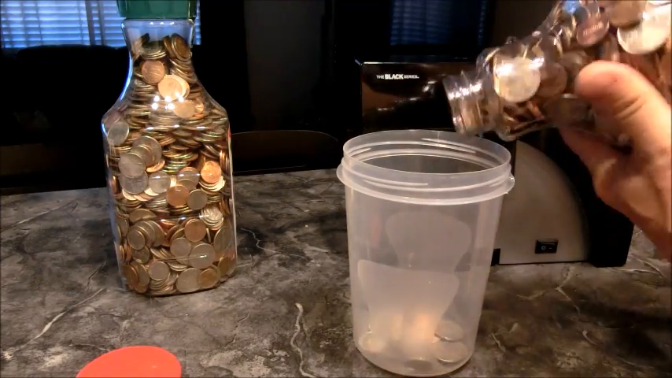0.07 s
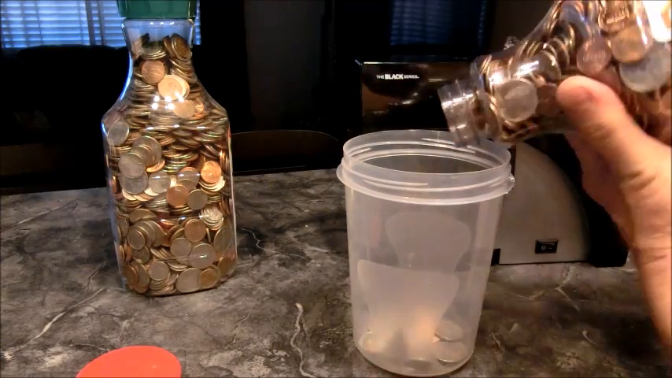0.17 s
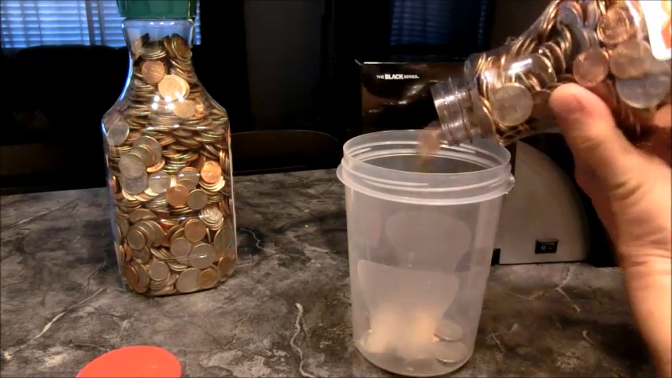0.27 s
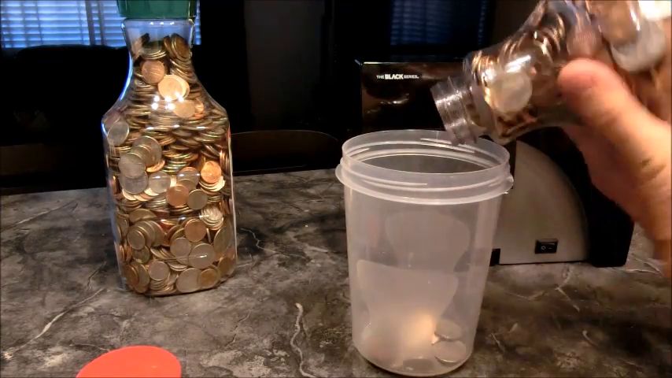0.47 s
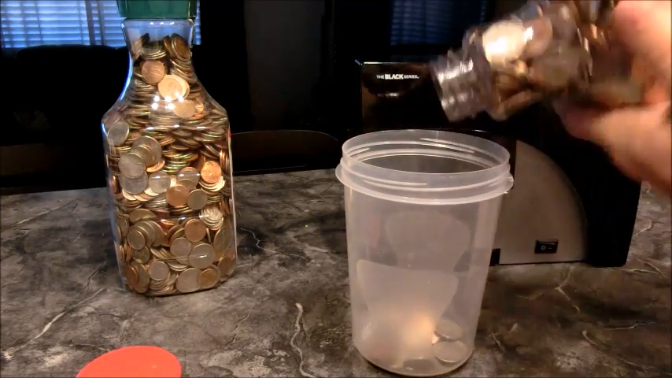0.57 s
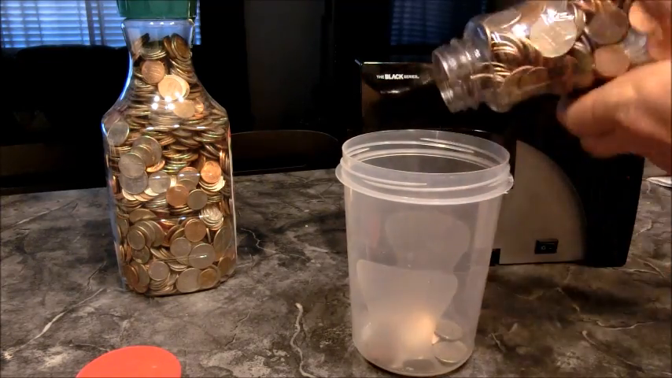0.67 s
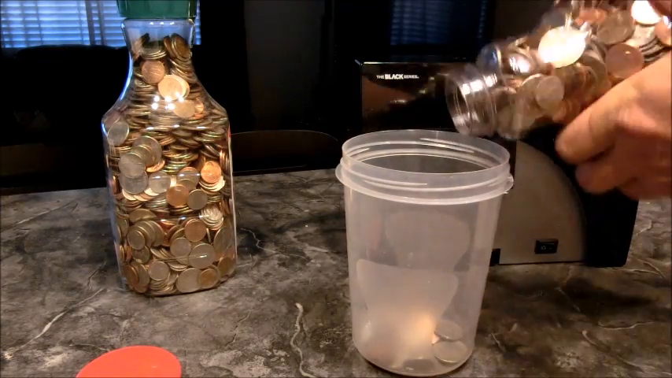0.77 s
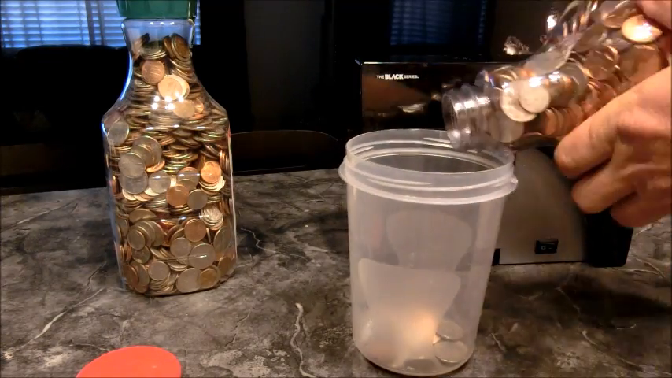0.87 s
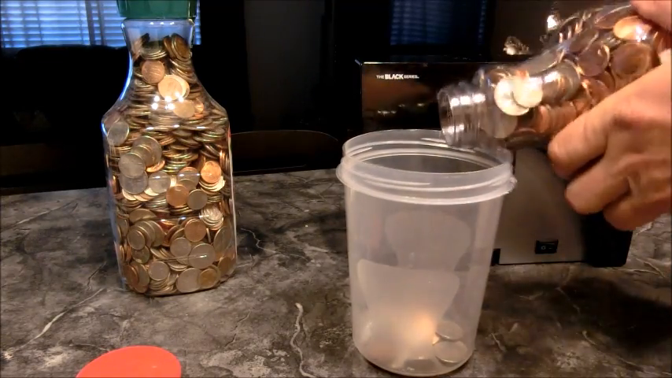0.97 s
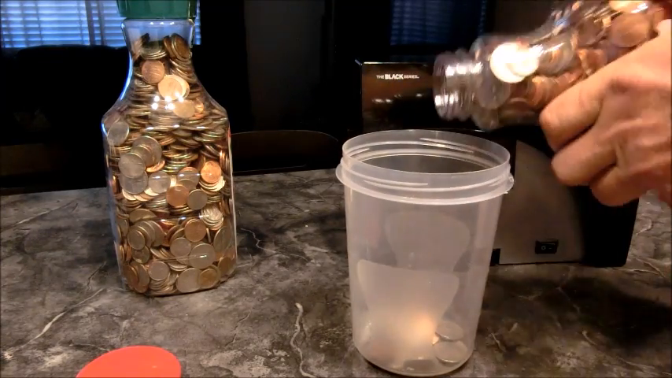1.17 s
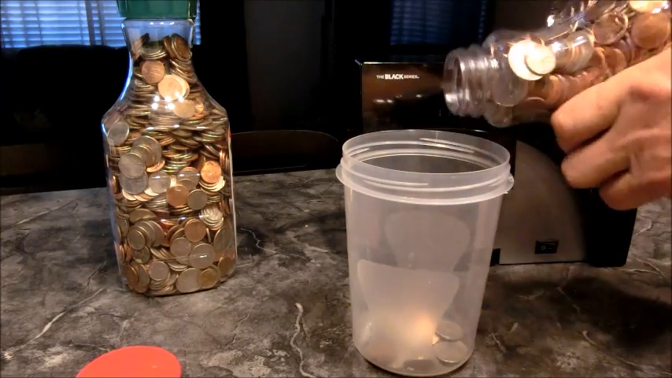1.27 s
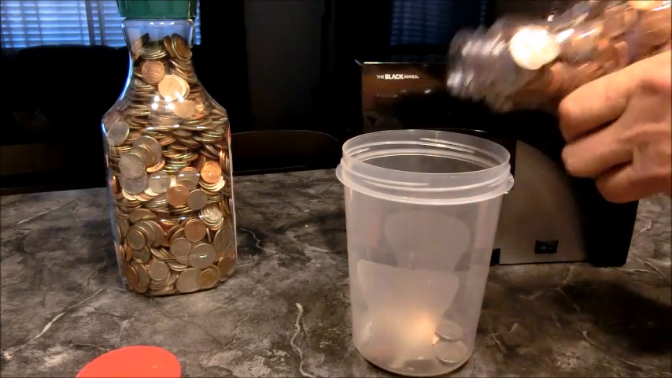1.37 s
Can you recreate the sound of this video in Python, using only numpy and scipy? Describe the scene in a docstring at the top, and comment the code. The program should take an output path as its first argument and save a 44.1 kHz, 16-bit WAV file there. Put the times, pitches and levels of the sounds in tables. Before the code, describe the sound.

Loose coins drop in uneven bursts into a plastic tub, bright jingling with dull bottle knocks

```python
"""On a kitchen counter, close to a camera's two microphones: coins are shaken from a plastic bottle
into a tall plastic tub. Each landing is a noise crack and clack, rough decaying coin tones, clatter
and a resonant tub boom; a few free coins add clean, wavering tones. Between landings, small random
contacts jingle and slide, and noise bursts knock in the bottle. A short room tail and steady air lie behind.
The scene opens on coin rings that are still fading."""
import sys
import numpy as np
from scipy import signal
from scipy.fft import rfft, irfft
from scipy.io import wavfile
from scipy.ndimage import uniform_filter1d

SR = 44100
rng = np.random.default_rng(int(sys.argv[2]) if len(sys.argv) > 2 else 0)


def master_out(mix):
    """Clip the mix to full scale and print it as 16-bit PCM to the path in sys.argv[1]."""
    frames = np.transpose(np.atleast_2d(mix))
    ceiling = np.clip(frames, -1, 1)
    pcm = np.round(ceiling * 32767).astype(np.int16)
    wavfile.write(sys.argv[1], SR, pcm)


N = 61740  # samples, 1.4 s
UNLIKE = 0.51  # size of each microphone's own part beside a shared part of 1


def undb(db):
    """Turn decibels into an amplitude factor."""
    return 10 ** (np.asarray(db) / 20)


def unit(x):
    """Scale to an RMS of 1 over both microphones."""
    return x / np.sqrt(np.mean(x ** 2))


def pair(n):
    """Noise at two close microphones: partly shared, partly their own."""
    return rng.standard_normal(n) + UNLIKE * rng.standard_normal((2, n))


def colour(x, points):
    """Filter through (f/Hz, level/dB) points, straight over log frequency."""
    points = np.array(points)
    hz = np.fft.rfftfreq(N, 1 / SR) + 1
    gain_db = np.interp(np.log(hz), np.log(points[:, 0]), points[:, 1])
    return irfft(rfft(x) * undb(gain_db), N)


def band(x, lo_hz, hi_hz):
    """Keep a band, its top held below 0.45 of the sample rate."""
    edges = [lo_hz, min(hi_hz, .45 * SR)]
    return signal.sosfilt(signal.butter(2, edges, "band", fs=SR, output="sos"), x)


def mode(x, hz, t60):
    """A resonance: each input impulse starts one decaying sine."""
    pole = np.exp(2j * np.pi * hz / SR - np.log(1000) / (t60 * SR))
    return signal.lfilter([1], [1, -pole], x).imag


def clicks(per_s, scatter_db):
    """Random small contacts of scattered sizes."""
    struck = rng.random(N) < per_s / SR
    size = struck * undb(scatter_db * np.minimum(rng.exponential(size=N), 3))
    return size * pair(N)


def burst(db, decay_s, lo_hz, hi_hz, rise_s=0.00049):
    """An impact as a short puff of band noise, with the given level before it decays."""
    t = np.arange(SR // 10) / SR
    env = np.exp(-t / max(decay_s, 1 / SR)) * np.minimum(t / rise_s, 1)
    x = band(pair(len(t)) * env, lo_hz, hi_hz)
    # make up for the energy lost in the band filter
    make_up = np.sqrt(np.mean(env ** 2) / np.mean(x ** 2, axis=1, keepdims=True))
    return x * undb(db) * make_up


def around(hz, width):
    """Band edges either side of a centre frequency."""
    return hz / (1 + width), hz * (1 + width)


def add(out, x, s):
    """Lay a sound into the scene at a time in seconds."""
    i = int(s * SR)
    out[:, i:i + x.shape[1]] += x[:, :N - i]


# Colour of the steady air: f/Hz, relative level per Hz/dB
AIR_COLOUR = [(18, -36), (30, -4), (125, -4.5), (355, -18), (499, 0), (632, -10.5), (2290, -1),
              (7470, -8.5), (13000, -11), (16000, -13)]
AIR_DB = -54.5  # RMS level


def room_air():
    """Steady coloured noise, mostly unlike at the two microphones."""
    noise = rng.standard_normal(N) + 2.0 * rng.standard_normal((2, N))
    return undb(AIR_DB) * unit(colour(noise, AIR_COLOUR))


ROOM_T60_S, ROOM_LOW_HZ = .21, 840
TUB_ROOM_DB, BOTTLE_ROOM_DB = -6.5, -6  # sends into the room


def kitchen_room(tub, bottle):
    """Reflections: convolve tub and bottle with a decaying noise tail."""
    t = np.arange(SR // 2) / SR
    tail = rng.standard_normal((2, len(t))) * undb(-60 * t / ROOM_T60_S) * np.minimum(t / 0.001, 1)
    tail = band(tail, ROOM_LOW_HZ, 20400)
    tail = tail / np.sqrt(np.sum(tail ** 2, axis=1, keepdims=True))
    sent = undb(TUB_ROOM_DB) * tub + undb(BOTTLE_ROOM_DB) * bottle
    return signal.fftconvolve(sent, tail, axes=1)[:, :N]


# Moving levels of the loose coins: t/s, jingle level/dB, sliding level/dB, tub hum level/dB,
# handling rumble level/dB
LOOSE_LEVELS = [(0.0, -38.5, -46.5, -38, -56), (0.02, -41, -51.5, -61, -64.5), (0.22, -83, -55, -69, -74),
                (0.246, -37.5, -56, -100, -49.5), (0.343, -41.5, -49, -87, -62),
                (0.372, -69, -44, -42.5, -55), (0.438, -46, -42.5, -45, -52.5),
                (0.473, -43, -50.5, -57.5, -63), (0.532, -58, -56.5, -63.5, -66),
                (0.579, -33, -45, -57, -55), (0.654, -58, -58.5, -61.5, -68.5), (0.744, -85, -51, -72, -61),
                (0.798, -76, -93, -98, -66), (0.827, -57, -49, -51, -55.5), (0.942, -84, -46, -63, -63),
                (0.976, -42.5, -44, -58, -55), (1.034, -67, -58.5, -66, -64.5), (1.11, -54, -51, -85, -67),
                (1.18, -59, -44.5, -58, -59), (1.2, -72, -49.5, -66, -59), (1.27, -71, -45, -59, -58.5),
                (1.298, -84, -43.5, -70, -63), (1.336, -61, -45, -58.5, -54), (1.4, -59, -45, -57.5, -68)]


def curve(column):
    """Follow one level column, straight in dB between its points."""
    points = np.array(LOOSE_LEVELS)
    return undb(np.interp(np.arange(N) / SR, points[:, 0], points[:, column]))


def handling_rumble():
    """Hands on the plastic: low band noise."""
    noise = pair(N) + 0.23 * rng.standard_normal((2, N))
    return curve(column=4) * unit(band(noise, 72, 530))


# Resonances of the plastic tub, which also boom at the landings: f/Hz, relative level/dB, t60/s
TUB_MODES = [(410, -20, .04), (490, -9, .08), (528, 0, .14)]


def tub_modes(drive):
    """The tub walls resonate to whatever drives them."""
    return sum(undb(db) * mode(drive, hz, t60) for hz, db, t60 in TUB_MODES)


def tub_hum():
    """Noise keeps the tub's resonances humming."""
    return curve(column=3) * unit(tub_modes(pair(N)))


# Colour of coins sliding on plastic: f/Hz, relative level per Hz/dB
SLIDE_COLOUR = [(350, -8), (600, -1), (1730, -3.5), (2340, -3.5), (7310, -10), (11700, -11.5),
                (12800, -0.5), (14700, -8), (16000, -32)]
SLIDE_PER_S, SLIDE_SCATTER_DB = 9000, 1


def sliding():
    """Dense contacts of nearly equal size scrape the plastic."""
    scrape = colour(clicks(SLIDE_PER_S, SLIDE_SCATTER_DB), SLIDE_COLOUR)
    return curve(column=2) * unit(scrape)


# Ring families of the coin heap: f/Hz, spread/share of f, relative level/dB
COIN_RINGS = [(9670, 0.042, -6.5), (10810, 0.017, -11), (13200, 0.026, -8.5), (13470, 0.018, -14),
              (15100, .015, -10), (16100, 0.0033, -23)]
JINGLE_PER_S, JINGLE_SCATTER_DB = 3500, 6
JINGLE_TICK_DB, JINGLE_T60_S = -9.5, 0.014  # tick level is relative to the rings


def jingle():
    """Dense small contacts ring 48 unlike coin modes, with bare ticks on top."""
    rings = 0
    for hz, spread, db in COIN_RINGS:
        for off in rng.uniform(-1.57, 1.3, size=8):
            contacts = clicks(JINGLE_PER_S / 48, JINGLE_SCATTER_DB)
            rings = rings + undb(db) * mode(contacts, hz * (1 + spread * off), JINGLE_T60_S)
    ticks = band(clicks(4 * JINGLE_PER_S, JINGLE_SCATTER_DB), 6900, 20000)
    return curve(column=1) * (unit(rings) + undb(JINGLE_TICK_DB) * unit(ticks))


THUMP_S, THUMP_HZ, THUMP_DB, THUMP_T60_S = .962, 154, -38.5, 0.057


def hand_thump():
    """A hand bumps the bottle: one low decaying sine."""
    out = np.zeros((2, N))
    t = np.arange(SR // 5)[None] / SR
    env = undb(THUMP_DB - 60 * t / THUMP_T60_S) * np.minimum(t / 0.0048, 1)
    add(out, env * np.sin(2 * np.pi * THUMP_HZ * t), THUMP_S)
    return out


# Coins knocking inside the bottle, levels before the trims below: t/s, tick level/dB,
# knock f/Hz, knock level/dB, chink f/Hz, chink level/dB, decay time constant/s
BOTTLE_KNOCKS = [(0.0706, -13, 2120, -50, 12200, -33, 0.0071), (0.116, -18, 2350, -53.5, 9990, -43, 0.012),
                 (0.136, -30, 550, -46.5, 13000, -51, 0.0045), (0.165, -16, 1820, -44, 8600, -40, 0.0035),
                 (0.1806, -19.5, 2290, -48, 13200, -38, 0.0077), (0.196, -12, 1780, -47, 12800, -49, 0.004),
                 (0.3558, -32, 2400, -47, 3600, -43, 0.0021), (0.7255, -28, 2300, -46, 4060, -55, 0.0032),
                 (0.674, -26, 696, -50.5, 11500, -55, 0.0084), (0.689, -39, 510, -51.5, 13000, -53, 0.0064),
                 (0.7046, -40, 1370, -43, 12300, -47, 0.0084), (0.7355, -73, 1090, -48, 12300, -48, 0.014),
                 (0.775, -20.5, 2730, -38, 13300, -40, 0.003), (0.9112, -19, 1130, -43, 12100, -40, 0.0065),
                 (0.922, -21, 1300, -43, 13300, -37, 0.007), (1.137, -19.5, 2480, -46, 10500, -37, 0.0064),
                 (1.1615, -17.5, 2150, -48, 10600, -57, 0.005),
                 (1.1755, -27, 427, -42.5, 2480, -37, 0.0041), (1.1882, -44, 990, -42.5, 13500, -54, 0.012),
                 (1.212, -23, 3240, -45.5, 13000, -37, 0.0059), (1.2198, -25, 690, -41, 1430, -44, 0.0038),
                 (1.228, -26, 1580, -44.5, 9600, -39.5, 0.0071),
                 (1.256, -34, 2290, -42, 12860, -27.5, 0.0037), (1.287, -22, 1870, -42, 12200, -33, 0.0049),
                 (1.335, -21, 740, -42.5, 10300, -37, 0.0036), (1.3444, -45, 630, -42.5, 13100, -44, 0.013),
                 (1.393, -20, 1750, -41, 12800, -39, 0.0098)]
TICK_DB, KNOCK_DB, CHINK_DB = -13.5, 2.5, 1  # trims
TICK_S, KNOCK_WIDTH, CHINK_WIDTH = .0018, .3, 0.12  # widths as shares of f
KNOCK_RISE = 0.32  # rise as a share of the decay time


def bottle_knocks():
    """Each coin gives a tick, a dull knock of the bottle wall and a damped chink."""
    out = np.zeros((2, N))
    for s, tick_db, knock_hz, knock_db, chink_hz, chink_db, decay_s in BOTTLE_KNOCKS:
        rise_s = KNOCK_RISE * decay_s
        add(out, burst(tick_db + TICK_DB, TICK_S, 1330, 19500), s)
        add(out, burst(knock_db + KNOCK_DB, decay_s, *around(knock_hz, KNOCK_WIDTH), rise_s), s)
        add(out, burst(chink_db + CHINK_DB, decay_s, *around(chink_hz, CHINK_WIDTH), rise_s), s)
    return out


# Coins that ring clean, free of the heap; those at t = 0 are already fading: t/s, f/Hz, level/dB, t60/s
FREE_COINS = [(0, 9082, -44, 0.42), (0, 13260, -52, 0.28), (0, 15160, -44, .25), (.068, 13280, -45, 0.32),
              (.2456, 13090, -32.5, .12), (.2456, 15620, -23, .14), (.3316, 13050, -30, 0.099),
              (.3685, 12235, -32, 0.28), (.3685, 14990, -32, .1), (.3685, 9340, -27, 0.24),
              (.38, 15710, -36, 0.35)]
TUMBLE_DB, TUMBLE_S = 4, .008  # RMS waver and its smoothing time


def free_coins():
    """Single fading tones that waver in level as the coin tumbles."""
    out = np.zeros((2, N))
    t = np.arange(SR // 2) / SR
    for s, hz, db, t60 in FREE_COINS:
        phase = rng.uniform(0, 2 * np.pi) + UNLIKE * rng.standard_normal((2, 1))
        waver_db = TUMBLE_DB * unit(uniform_filter1d(pair(len(t)), size=int(TUMBLE_S * SR)))
        add(out, undb(db + waver_db - 60 * t / t60) * np.sin(2 * np.pi * hz * t + phase), s)
    return out


RING_DB, RING_SIDE_DB = -5.5, -1.5  # ring trim; each neighbour against the main mode
RING_SPREAD, RING_ROUGH = 0.04, .8  # neighbour spread as a share of f; RMS depth of the shaking


def ring(hz, db, t60):
    """A coin mode with weaker ones of the coins it strikes, shaken by contact with the heap."""
    t = np.arange(SR // 4) / SR
    tone = 0
    for k in range(7):
        neighbour = k > 0
        off, turn, skew = rng.uniform(-1.028, 1, size=3)
        mode_hz = hz * (1 + RING_SPREAD * off * neighbour)
        phase = np.pi * (turn + skew * np.array([[0], [UNLIKE]]))  # skewed between microphones
        tone = tone + undb(RING_SIDE_DB * neighbour) * np.sin(2 * np.pi * mode_hz * t + phase)
    shake = 1 + RING_ROUGH * unit(uniform_filter1d(pair(len(t)), size=30))
    return undb(db + RING_DB - 60 * t / t60) * tone * shake


# Coins landing in the tub; the first row is coin rings still fading as the scene opens.
# Levels before the trims: t/s, crack level/dB, boom level/dB, clack level/dB, clack f/Hz,
# low ring f/Hz and level/dB, middle ring f/Hz and level/dB, high ring f/Hz and level/dB, ring t60/s
TUB_COINS = [(0.0004, -26.5, -48, -50, 1470, 9300, -48, 13500, -50, 16460, -33, 0.077),
             (0.2453, -15, -24.5, -32.5, 2460, 8420, -20, 11300, -24.5, 15250, -21, 0.014),
             (0.3316, -26, -35.5, -47, 2940, 9300, -31, 13170, -31, 16160, -25, 0.024),
             (0.3683, -11.5, -40, -35.5, 1900, 9800, -12, 12250, -23, 15100, -16, 0.02),
             (0.3734, -24, -37, -40, 2500, 9370, -34, 11700, -36, 15000, -22, 0.028),
             (0.4016, -17.5, -66, -32, 3620, 5520, -25, 10200, -23, 14400, -18, 0.03),
             (0.4068, -24, -30, -34.5, 2260, 5330, -43, 12200, -30, 15700, -16, 0.022),
             (0.4247, -48, -71, -55, 2500, 9440, -26.5, 12900, -26, 15540, -32, 0.063),
             (0.4416, -19.5, -42.5, -59, 2480, 9660, -41, 11900, -51, 15000, -29, 0.085),
             (0.5617, -20, -40.5, -46, 1925, 9900, -30.5, 12570, -34.5, 14900, -37, 0.069),
             (0.5664, -27, -52, -44.5, 3130, 8860, -33.5, 14100, -44, 14650, -26, 0.05),
             (0.5736, -28, -53, -44, 2340, 9530, -34, 13300, -29, 14900, -27, 0.046),
             (0.834, -32, -45, -44.5, 3520, 10700, -47, 14000, -41, 15000, -49, 0.055),
             (0.8502, -22, -31, -39.5, 1450, 9960, -33, 12040, -38, 14700, -40, 0.06),
             (0.8576, -27, -35, -40, 3360, 9380, -39, 12800, -40, 15300, -47, 0.032)]
CRACK_DB, CLACK_DB, BOOM_DB = -8, 5, -7  # trims
CRACK_S, CRACK_LOW_HZ = 0.004, 6800
CLACK_S, CLACK_WIDTH = 0.0028, .22  # width as a share of f
CLATTER_DB, CLATTER_S = -19.5, 0.048  # level against the table's crack


def coins_in_tub():
    """Crack, plastic clack, three coin rings, clatter of the settling heap and the tub's boom."""
    out, blow = np.zeros((2, N)), np.zeros(N)
    for s, crack_db, boom_db, clack_db, clack_hz, *rings, t60 in TUB_COINS:
        add(out, burst(crack_db + CRACK_DB, CRACK_S, CRACK_LOW_HZ, SR / 2), s)
        add(out, burst(clack_db + CLACK_DB, CLACK_S, *around(clack_hz, CLACK_WIDTH)), s)
        for hz, db in zip(rings[::2], rings[1::2]):
            add(out, ring(hz, db, t60), s)
        add(out, burst(crack_db + CLATTER_DB, CLATTER_S, 1980, 23000, 0.0011), s)
        blow[int(s * SR)] += undb(boom_db + BOOM_DB)
    boom = band(band(tub_modes(blow), 366, 790), 366, 790)
    return out + boom


LEFT_LAG = .7  # samples


def lag_left(x):
    """The left microphone hears everything a fraction of a sample later."""
    delay = np.exp(-2j * np.pi * LEFT_LAG * np.fft.rfftfreq(N))
    return np.array([irfft(rfft(x[0]) * delay, N), x[1]])


def scene():
    """Tub and bottle close by, with the room and its air behind."""
    bottle = handling_rumble() + tub_hum() + sliding() + jingle() + hand_thump() + bottle_knocks()
    tub = free_coins() + coins_in_tub()
    return lag_left(room_air() + kitchen_room(tub, bottle) + bottle + tub)


TOP_HZ = 15800


def record(dry):
    """A steep low-pass leaves nothing above 15.8 kHz."""
    return signal.sosfilt(signal.ellip(12, .2, 90, TOP_HZ, fs=SR, output="sos"), dry)


dry = scene()
out = record(dry)
master_out(out)
```